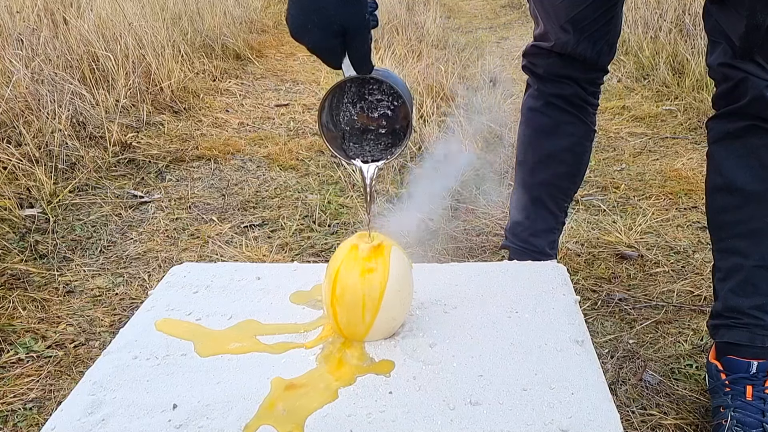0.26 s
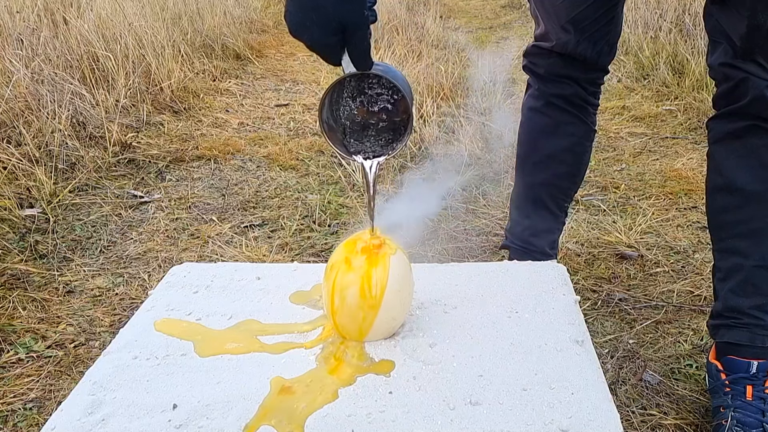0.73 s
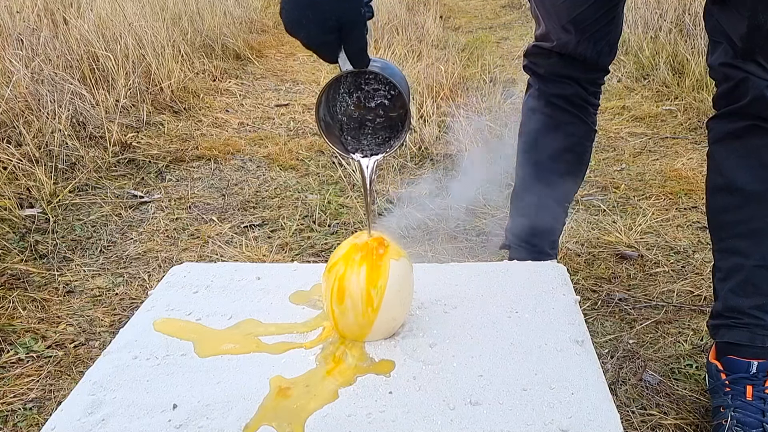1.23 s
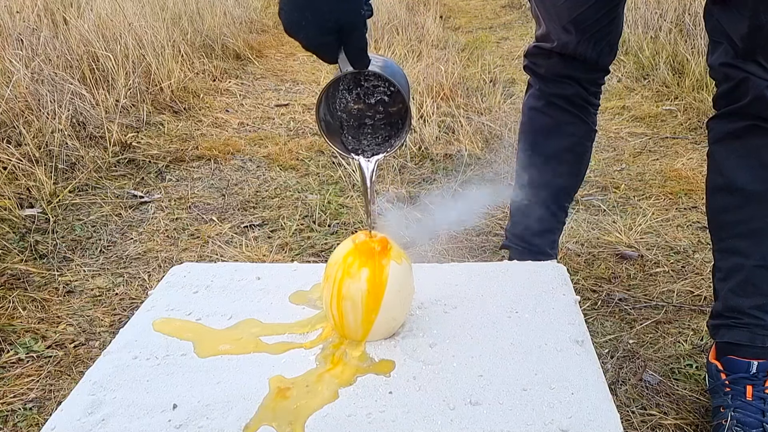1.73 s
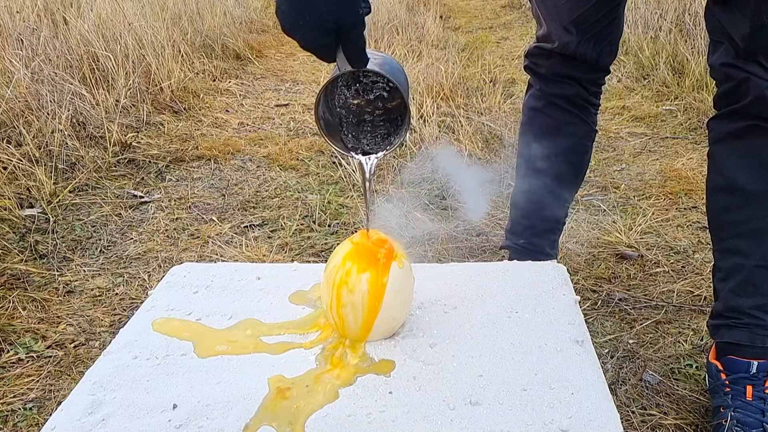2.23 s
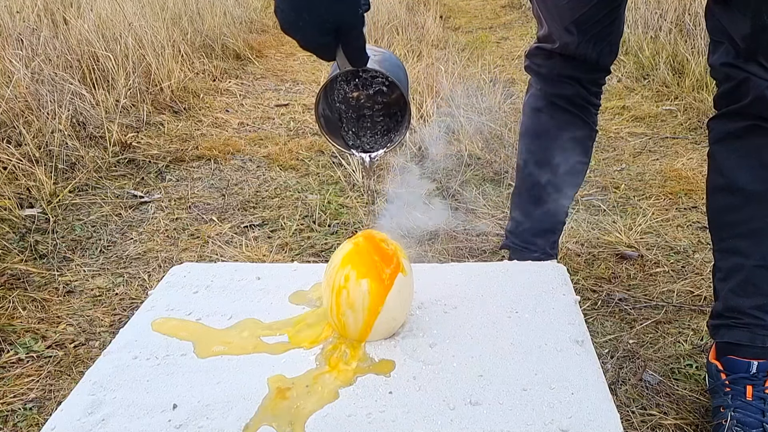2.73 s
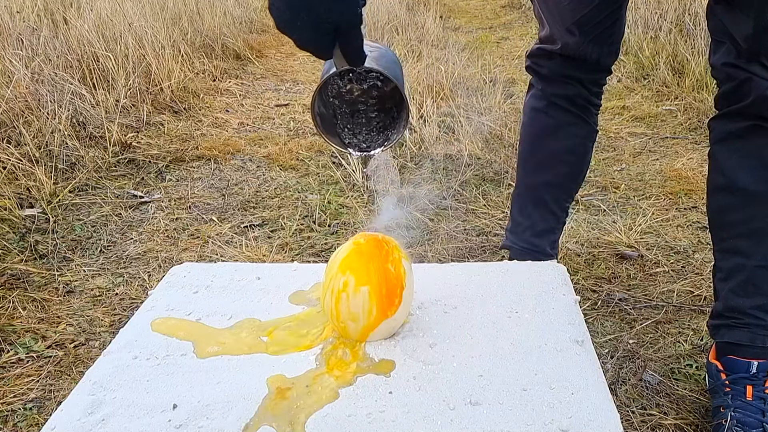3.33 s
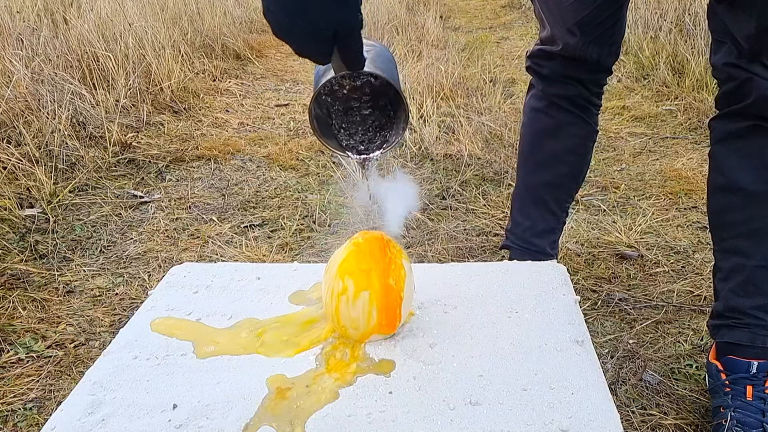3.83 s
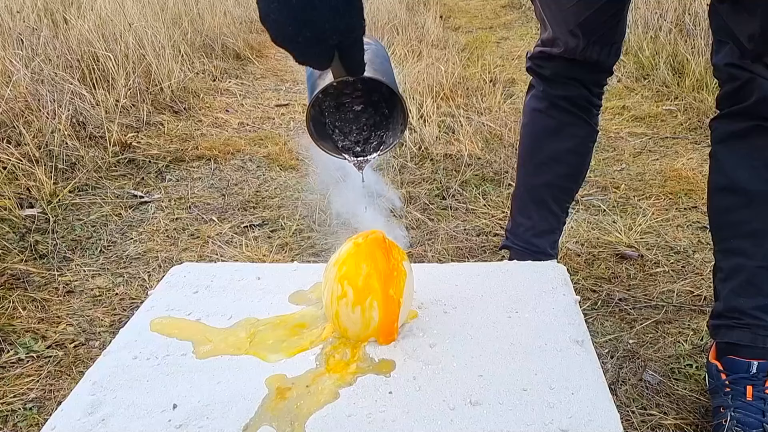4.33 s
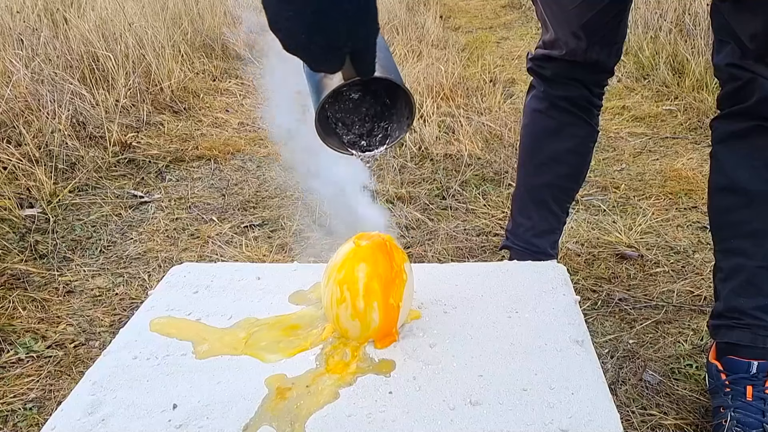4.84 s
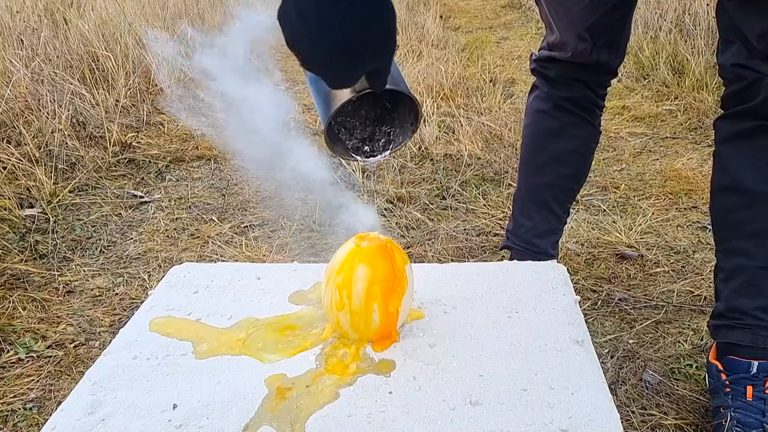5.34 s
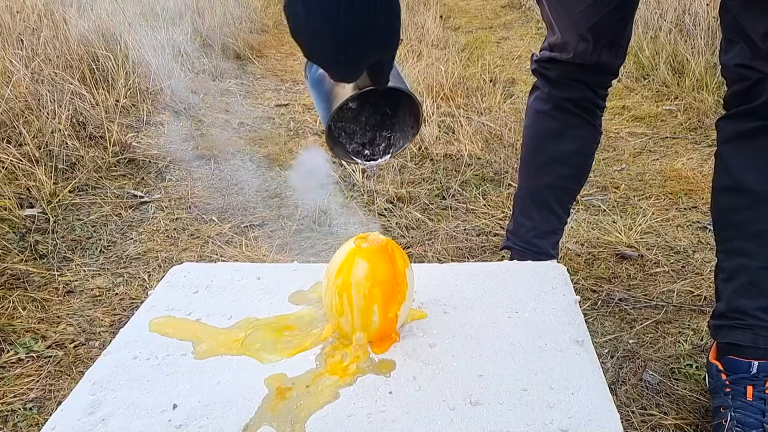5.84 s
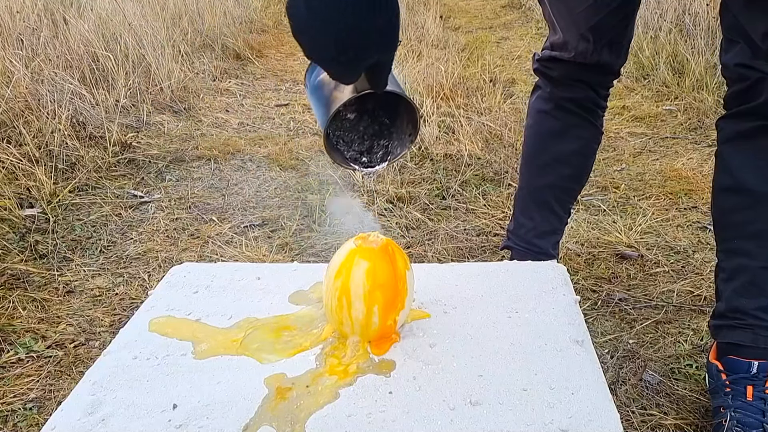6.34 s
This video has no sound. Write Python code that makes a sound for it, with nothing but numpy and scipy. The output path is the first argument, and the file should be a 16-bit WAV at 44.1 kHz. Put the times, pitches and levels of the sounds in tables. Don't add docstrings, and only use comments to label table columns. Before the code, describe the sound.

Close, uneven steam sizzle with sharp ticks, wet spits and low bubbling fades gradually as buffeting wind rumble overwhelms the microphone.

```python
import sys
import numpy as np
from scipy import signal
from scipy.fft import rfft, irfft, next_fast_len
from scipy.io import wavfile
from scipy.ndimage import uniform_filter1d

SR = 44100
rng = np.random.default_rng(int(sys.argv[2]) if len(sys.argv) > 2 else 0)


def ratio(d):
    e = np.asarray(d, float) / 20
    return 10 ** e


def persist_wave(psi):
    counts = np.round(np.clip(psi, -1, 1) * 32767).astype(np.int16)
    wavfile.write(sys.argv[1], SR, np.atleast_2d(counts).T)


N = 289737
TIME = np.arange(N) / SR
PAD = next_fast_len(N + 4096)
HZ = np.maximum(np.arange(PAD // 2 + 1) * SR / PAD, 1)


def rms_one(x):
    return x / np.sqrt(np.mean(x ** 2) + 1e-20)


def in_time(rows):
    s, *columns = np.transpose(rows)
    return [np.interp(TIME, s, column) for column in columns]


def colour(points):
    hz, db = np.transpose(points)
    return ratio(np.interp(np.log(HZ), np.log(hz), db))


def band(low_hz, high_hz, steep):
    return 1 / np.sqrt((1 + (low_hz / HZ) ** steep) * (1 + (HZ / high_hz) ** steep))


def shaped(x, gain):
    return irfft(rfft(x, PAD) * gain, PAD)[..., :N]


def drift(rate):
    r = np.exp(-40 * np.pi * rate / SR)
    slow = signal.lfilter([1], [1, -2 * r, r * r], rng.standard_normal(N // 20 + 2002))[2000:]
    return np.interp(np.arange(N) / 20, np.arange(len(slow)), rms_one(slow))


def evened(x, span_s, share):
    power = uniform_filter1d(x ** 2, int(span_s * SR)) + 1e-9
    return rms_one(x / power ** (share / 2))


def swells(seep_db, times, levels_db, rises_ms, falls_ms):
    power = ratio(2 * seep_db)
    for s, db, rise, fall in zip(times, levels_db, rises_ms, falls_ms):
        near = slice(max(int((s - .2) * SR), 0), int((s + .25) * SR))
        ms = 1000 * (TIME[near] - s)
        width = np.where(ms < 0, max(0.94 * rise - 1.2, .5), max(fall, 1))
        power[near] += ratio(2 * db) * np.exp(-(ms / width) ** 2)
    return np.sqrt(power)


def turbulence(per_s, pitches, cycles, grain_share, scattered):
    sizes_db = 4 * np.minimum(rng.exponential(1, N), 3)
    born = (rng.random(N) < per_s / SR) * ratio(sizes_db) * rng.choice([-1, 1], N)
    dealt, rings = rng.integers(0, len(pitches), N), 0
    for k, hz in enumerate(pitches):
        r, turn = ratio(-60 * hz / cycles / SR), 2 * np.pi * hz / SR
        struck = born * (dealt == k) + 1e-18
        ring = signal.lfilter([1], [1, -2 * r * np.cos(turn), r * r], struck)
        rings = rings + rms_one(ring) * np.sqrt(hz)
    direct = rng.standard_normal(N) + grain_share * rms_one(rings)
    return rfft(direct + scattered * rng.standard_normal((2, N)), PAD)


def opening(source, edges, envelope, climb_ms, patchy_db, together, tilt_db=0):
    out = 0
    for low_hz, high_hz in zip(edges, edges[1:]):
        early = np.interp(TIME + climb_ms / 1000 * np.log2(2500 / low_hz), TIME, envelope)
        flicker = ratio(together + patchy_db * drift(24.0) + tilt_db * np.log2(low_hz / 1000))
        out = out + irfft(source * band(low_hz, high_hz, steep=14.3), PAD)[:, :N] * early * flicker
    whole = source * band(edges[0], edges[-1], steep=2.69)
    return out / np.sqrt(np.mean(np.abs(whole) ** 2) / N)


def field():
    rustle = rng.standard_normal(N) + 1.6 * rng.standard_normal((2, N))
    fizz = rng.standard_normal(N) + .7 * rng.standard_normal((2, N))
    rustle = rms_one(shaped(rustle, band(300, 1600, steep=6.9)))
    fizz = rms_one(shaped(fizz, band(16000, 18000, steep=15)))
    return ratio(-61.0) * rustle + ratio(-48) * fizz


# (time [s], left level [dB], right level [dB])
BREEZE = [(0.0, -45, -58), (0.56, -66, -60), (1.12, -76, -44), (1.68, -51, -44.5), (2.23, -46.5, -43.5),
          (2.79, -43, -48), (3.35, -74, -54), (3.91, -42, -44), (4.47, -43.5, -60), (5.03, -40, -29),
          (5.59, -31, -26), (6.15, -40.5, -55), (6.57, -26, -21)]
# (time [s], level [dB], width [ms], sharp edge re rumble [dB])
GUSTS_LEFT = [(0.168, -40, 54, -28), (0.529, -34.5, 56, -27), (0.747, -39, 66, -24), (0.876, -28, 3.7, -20),
              (1.147, -45.5, 170, -28), (1.834, -38, 24, -29), (2.001, -42, 81, -18), (2.358, -37, 26, -23),
              (3.082, -43, 110, -21), (3.209, -35, 28, -40), (3.418, -34.5, 28, -32),
              (3.508, -31.5, 7.1, -12), (3.737, -30, 31, -22), (3.905, -30, 34, -25), (4.344, -44, 15, -23),
              (4.695, -30, 13, -18), (4.909, -22, 26, -17), (4.974, -7, 12, -24), (5.137, -17, 37, -27),
              (5.288, -18.5, 14, -25), (5.596, -19, 11, -23), (5.727, -13.5, 46, -32),
              (5.851, -16.5, 36, -12), (5.884, -7, 25, -29), (6.162, -14.5, 7.2, -29),
              (6.332, -13.5, 34, -23)]
GUSTS_RIGHT = [(0.256, -33.5, 86, -22), (0.521, -33, 32, -34), (0.689, -37, 21, -35), (0.929, -37, 87, -23),
               (1.825, -38, 16, -28), (2.367, -39, 29, -25), (3.108, -48, 300, -14),
               (3.221, -28.5, 7.4, -32), (3.373, -33, 22, -23), (3.692, -28, 36, -32),
               (3.929, -32, 26, -23.5), (4.138, -39, 17, -14), (4.387, -40, 36, -26),
               (4.599, -20, 19.4, -34), (4.713, -20.5, 26, -20), (4.844, -19.5, 47, -30),
               (5.06, -12, 34, -10.5), (5.133, -5.5, 3.9, -30), (5.242, -16, 9.5, -9),
               (5.306, -21, 7, -37.9), (5.453, -18, 24, -7), (5.522, -7.5, 14.6, -4),
               (5.59, -13.5, 27, -15.5), (5.803, -16, 75, -16), (6.007, -14.5, 9.3, -34),
               (6.086, -19, 29, -21), (6.217, -24.5, 53, -17), (6.302, -25, 9.4, -20),
               (6.521, -12.5, 16.6, -17.5)]
# (frequency [Hz], density [dB per Hz])
WIND_COLOUR = [(15, -32), (25, -28), (38, 10), (58, 12.5), (100, 7), (180, -7.5), (300, -54)]


def wind():
    squall_s, squall_edge_db = 4.5, -10.5
    out = []
    for breeze_db, gusts in zip(in_time(BREEZE), (GUSTS_LEFT, GUSTS_RIGHT)):
        s, db, width, edge_db = np.transpose(gusts)
        rumble = rms_one(shaped(rng.standard_normal(N), colour(WIND_COLOUR)))
        rumble = evened(rumble, span_s=.025, share=.45)
        edge = shaped(rng.standard_normal(N) * ratio(3.5 * drift(30)), band(130, 270, steep=8))
        thump = swells(breeze_db, s, db, 1.31 * width, width)
        edge_peaks_db = db + edge_db + 5.0 + squall_edge_db * (s > squall_s)
        lumps = swells(breeze_db - 20.5, s - .004, edge_peaks_db, width, 0.99 * width)
        out.append(rumble * thump + rms_one(edge) * lumps)
    return np.array(out)


# (time [s], level [dB], fall [ms], brightness [dB])
POPS = [(0.25, -27.5, 25.5, -8), (0.515, -27.5, 13, -1), (0.575, -30, 40, -5), (0.761, -30, 10, -4),
        (0.891, -28, 35, -1.5), (1.4, -20, 11.3, -1.5), (1.531, -22, 9.2, 0.5), (1.691, -17, 18, -0.5),
        (2.047, -21.5, 12, 5), (2.104, -20.5, 32, 3.5), (2.343, -21, 10.3, -14), (2.374, -30, 140, -2),
        (2.488, -26.5, 19, 0), (2.857, -27, 14, 1.5), (3.619, -23.5, 26.7, 4.5), (3.693, -25, 22, 6),
        (3.817, -22.5, 11, 6.5), (3.865, -22, 8.3, 8), (3.987, -23.5, 20, 5), (4.056, -25, 43, 6.5),
        (4.279, -28, 6.5, -3), (4.342, -21, 14.4, 3.5), (4.573, -28.5, 88, 12), (4.701, -32, 7, 3),
        (4.796, -28, 16, 1.5), (5.083, -24.5, 20, 5), (5.205, -23, 18, 3.5), (5.347, -27.5, 26, 5),
        (5.559, -28, 7.8, 1.5), (6.042, -40, 170, 13)]
# (time [s], level [dB], half length [ms], brightness [dB])
HEAVES = [(0.106, -26.5, 6, 2.5), (0.42, -27.5, 13.5, 23), (0.702, -24, 2.3, 4), (1.074, -20.5, 6.3, -11),
          (1.145, -24, 28, -1), (1.23, -21.5, 12.7, -9), (1.286, -21, 14.5, -1.5), (1.349, -24.5, 21, -2.5),
          (1.471, -20, 4, 4), (1.782, -20.5, 5.9, -1), (2.035, -27, 29, 0.5), (2.276, -19.5, 12, -8),
          (2.558, -19, 9.3, -1), (2.61, -32, 32, 13), (2.685, -21, 36, 2), (2.723, -17, 2.9, -17),
          (2.78, -15.5, 3.9, 6), (3.112, -36.5, 69, 0), (3.42, -28, 29.5, 2.5), (3.509, -24, 6.4, 6),
          (3.758, -23, 21, 4.5), (3.913, -28, 10, 3), (4.165, -25.5, 67, 5.5), (4.45, -34, 53, 5),
          (4.887, -26.5, 15, 10), (4.978, -29, 32, 9), (5.206, -34.5, 34, -8), (6.05, -23, 8.3, 4.5),
          (6.348, -39.5, 140, 4.5)]
# (time [s], level [dB], rise [ms])
SURGES = [(0.034, -24.5, 115), (0.213, -34.5, 74), (0.426, -31.5, 52), (0.84, -29, 43), (1.484, -29, 57),
          (1.881, -19, 39), (1.986, -21.5, 35), (3.011, -38, 26), (3.566, -27.5, 47), (3.873, -29, 48),
          (3.966, -28, 38), (4.918, -29, 44), (5.48, -36, 92)]
# (time [s], level [dB], brightness [dB])
SPURTS = [(0.21, -30.5, 14), (0.254, -35, 3), (0.325, -35, 0), (0.392, -28.5, -13), (0.479, -33.5, -15),
          (0.775, -30.0, 0), (0.802, -24, -10), (0.854, -24, -2), (0.996, -27, -20), (1.011, -24, 0),
          (1.172, -29, 13), (1.309, -29, 2), (1.655, -24, 4), (1.764, -26, 7), (1.815, -19, 14),
          (1.866, -22, 1), (1.878, -25, -1), (1.986, -25, 15), (2.104, -25, 11), (2.379, -21.5, 14),
          (2.487, -23.5, -20), (2.605, -29, 10), (2.722, -24.5, -5), (2.76, -21, -2.5), (2.783, -27, -1.0),
          (2.811, -25, 8), (3.005, -25, 14), (3.092, -26.5, 12), (3.656, -20, 12.0), (3.868, -23.5, 0),
          (3.965, -26, 11), (4.158, -26, 5), (4.434, -26.5, 2), (4.576, -34, -2), (4.653, -36, 7),
          (4.704, -26, 15), (4.847, -36, 11), (4.98, -29.5, 0)]


def puffs():
    pops = [(s - .0015, db, 4.3, ms, bright) for s, db, ms, bright in POPS]
    heaves = [(s, db, 1.03 * ms, ms, bright) for s, db, ms, bright in HEAVES]
    surges = [(s, db, ms, 0.14 * ms, 2) for s, db, ms in SURGES]
    spurts = [(s, db, 6, 4.3, bright) for s, db, bright in SPURTS]
    return np.transpose(pops + heaves + surges + spurts)


# (frequency [Hz], density [dB per Hz])
JET_COLOUR = [(2000, 13.5), (2800, -2), (4000, -0.5), (7000, 3.5), (8400, 3), (12000, -1.5), (15500, 12)]


def steam(hiss_db, bright_db):
    s, db, rise, fall, bright = puffs()
    pitches = np.geomspace(2800, 11000, 18)
    jet = turbulence(per_s=1400, pitches=pitches, cycles=70, grain_share=.6, scattered=.6)
    jet = jet * colour(JET_COLOUR)
    flutter_db = 1.85 * drift(40)
    lower_hz = [2570, 3400, 4420, 5450, 6300, 7400]
    upper_hz = [8200, 10100, 11500, 14300, 16900]
    out = 0
    for sign, edges in ((-1.83, lower_hz), (1.0, upper_hz)):
        share = lambda tilt_db: -10 * np.log10(1 + ratio(-2 * sign * tilt_db))
        envelope = swells(hiss_db + share(bright_db), s, db + share(bright), rise, fall)
        out = out + opening(jet, edges, envelope, climb_ms=0.75, patchy_db=3.0, together=flutter_db)
    return ratio(-3.0) * out


# (time [s], level [dB], length [ms])
GURGLES = [(0.004, -30.5, 23), (0.102, -24.5, 20), (0.153, -34, 38), (0.226, -28.5, 18), (0.85, -43, 290),
           (0.997, -29, 14), (1.076, -38, 10), (1.13, -32.5, 34), (1.229, -30, 60), (1.31, -28, 94),
           (1.43, -34, 230), (1.697, -31, 27), (1.852, -27, 33), (1.953, -24.5, 39), (2.017, -18, 18.6),
           (2.118, -30, 16.3), (2.194, -27, 26), (2.271, -31.5, 81), (2.345, -23, 29), (2.408, -26, 29),
           (2.481, -30, 72), (2.547, -23, 26), (2.633, -27, 36), (2.768, -36.5, 106)]


def froth_bursts():
    rise_share, pour_end_s = 0.62, 3.0
    stir_db, drying_db_per_s, stretch = -14.5, -2.5, 2.12
    poured = [(s, db, rise_share * ms, (1 - rise_share) * ms) for s, db, ms in GURGLES]
    stirred = [(s, db + stir_db + drying_db_per_s * max(s - pour_end_s, 0), rise, stretch * fall)
               for s, db, rise, fall, _ in puffs().T]
    return np.transpose(poured + stirred)


# (frequency [Hz], density [dB per Hz])
MOUTH_COLOUR = [(200, -1), (300, -9), (500, -6), (900, -3), (1500, 0), (2200, 0.5), (3000, 9)]
# (time [s], tilt [dB per octave])
HOLLOW = [
    (0, -4.5),
    (.7, -2.5),
    (1.3, 1),
    (2.8, -2),
    (4.4, -3.5),
    (6.57, 4),
]


def gurgle(gurgle_db):
    envelope = swells(gurgle_db, *froth_bursts())
    pitches = np.geomspace(300, 2400, 9)
    froth = turbulence(per_s=400, pitches=pitches, cycles=12, grain_share=.36, scattered=.2)
    froth = froth * colour(MOUTH_COLOUR)
    return ratio(-4.5) * opening(froth, np.geomspace(200, 3000, 8), envelope, climb_ms=3.7,
                               patchy_db=1.5, together=3.0 * drift(34), tilt_db=in_time(HOLLOW)[0])


def bloops():
    out, waver = np.zeros(N), drift(210.0)
    for s, db, length in GURGLES:
        near = slice(max(int((s - .04) * SR), 0), int((s + .03) * SR))
        part = (TIME[near] - s) * 1000 / length
        octaves = 4 * np.minimum(part + .1, .05 * part) + .1 * waver[near]
        hz = np.maximum(1800 * 2 ** octaves, 420)
        level_db = db - 1 - .5 * max(length - 20, 0)
        bell = np.exp(-((part + 0.13) / 0.071) ** 2)
        out[near] += ratio(level_db) * bell * np.sin(2 * np.pi * np.cumsum(hz) / SR)
    return out


# (time [s], peak level [dB])
TICKS = [(0.2536, -15), (0.31, -11), (0.3223, -12.5), (0.3668, -7), (0.4215, -14), (0.7009, -5.5),
         (0.7607, -7), (0.8534, -3), (0.9958, -13), (1.177, -16), (1.312, -8), (1.3968, -6), (1.4064, 0),
         (1.4222, -14), (1.452, -13), (1.4681, -14), (1.4706, -13), (1.614, -1), (1.7045, -13),
         (1.8657, -10), (1.9222, -14), (1.9418, -8), (1.9844, -4), (2.0532, -7), (2.1024, -7), (2.135, -13),
         (2.1403, -9), (2.144, -21), (2.1942, -12), (2.2644, -14), (2.3448, -15), (2.4286, 0.5),
         (2.4866, -17), (2.6053, -15), (2.6255, -12), (2.7127, -11), (2.826, -23), (2.9088, -16),
         (2.9849, -17), (3.2109, -17), (3.5662, -15), (3.5725, -16), (3.7021, -14), (3.7082, -15),
         (3.9266, -20), (3.962, -8), (3.9878, -17), (4.0075, -11), (4.0663, -10.5), (4.175, -15),
         (4.3449, -16), (4.7036, -13), (4.98, -9), (5.0355, -17), (5.084, -13), (5.098, -15)]


def ticks(hiss_db):
    tick_db, tick_ms, stray_per_s, stray_db = -5, 0.038, 300, 3.5
    sizes_db = 1.37 * np.minimum(rng.exponential(1, N), 3)
    marks = (rng.random(N) < stray_per_s / SR) * ratio(hiss_db + stray_db + sizes_db)
    s, db = np.transpose(TICKS)
    marks[np.round(s * SR).astype(int)] = ratio(db + tick_db)
    part = np.arange(-20, 21) / SR * 1000 / tick_ms
    return np.convolve(marks, (part ** 2 - 1) * np.exp(-part ** 2 / 2), "same")


# (time [s], level [dB], pitch [Hz])
BLUBS = [(0.09, -24.5, 492), (0.155, -29, 465), (0.219, -23.5, 440), (0.368, -22, 424), (0.441, -34, 370),
         (0.464, -26, 427), (0.574, -24.5, 510), (0.615, -27, 416), (0.685, -26, 447), (0.752, -28, 428),
         (0.847, -27, 468), (0.881, -28, 438), (0.973, -33.0, 467), (1.054, -25, 488), (1.764, -41, 550),
         (1.813, -29, 361), (1.945, -27, 443), (2.005, -24, 477), (2.174, -29, 455), (2.234, -26, 366.0),
         (2.331, -31, 451), (2.4, -25, 336), (2.725, -28.5, 389), (3.375, -31, 487), (3.787, -29, 414),
         (4.115, -32, 506.0)]


def blubs():
    level_db, length_ms, climb_octaves = -9, 4.14, 0.1434
    out, wobble = np.zeros(N), ratio(2.6 * drift(230.0))
    chance = rng.uniform(-0.998, 1, (len(BLUBS), 2))
    for (s, db, hz), (longer, glide) in zip(BLUBS, chance):
        near = slice(int((s - .025) * SR), int((s + .025) * SR))
        part = (TIME[near] - s) * 1000 / (length_ms * (1 + 0.27 * longer))
        pitch = hz * 2 ** (climb_octaves * (1 + 1.61 * glide) * part)
        out[near] += ratio(db + level_db) * np.exp(-part ** 2) * np.sin(2 * np.pi * np.cumsum(pitch) / SR)
    return out * wobble


# (time [s], peak level [dB], pitch [Hz])
SPITS = [(0.2513, -15.5, 2300), (0.571, -19, 3620), (0.701, -16.5, 2020), (0.761, -25, 2380),
         (0.995, -18, 2220), (1.397, -20, 3800), (2.1024, -25, 3860), (2.263, -10.5, 2230),
         (2.488, -31, 3960), (2.603, -30, 3790), (4.092, -24.5, 895), (4.678, -33, 610), (4.685, -34, 970),
         (4.783, -28.5, 950)]


def spits():
    out, after = np.zeros(N), np.arange(300) / SR
    for s, db, hz in SPITS:
        cycles = after * hz
        first, ring = np.sin(np.pi * cycles / 2) + .3, .35 * np.exp(-cycles / 1.5)
        pulse = np.sin(2 * np.pi * cycles) * np.where(cycles < 1, first, ring)
        pulse[:2] -= hz / 2500
        start = round(s * SR)
        out[start:start + 300] += ratio(db + 1) * pulse
    return out


# (time [s], level [dB])
SLAPS_LEFT = [(4.967, -17.0), (5.075, -23), (5.111, -24), (5.166, -23), (5.499, -22), (5.64, -30),
              (5.664, -18.5), (5.692, -23), (5.737, -20), (5.774, -28), (5.861, -12.5), (5.889, -20),
              (6.156, -22), (6.278, -35), (6.332, -16)]
SLAPS_RIGHT = [(4.798, -19), (4.83, -20), (5.052, -9), (5.081, -10), (5.138, -19), (5.241, -23),
               (5.424, -11), (5.454, -7.5), (5.511, -8), (5.549, -30), (5.586, -9.5), (5.727, -15),
               (5.744, -29), (5.808, -15.5), (5.87, -25), (6, -26.5), (6.095, -20.5), (6.519, -17)]


def slaps():
    out = []
    for table in (SLAPS_LEFT, SLAPS_RIGHT):
        s, db = np.transpose(table)
        rumble = shaped(rng.standard_normal(N), band(75, 207.5, steep=7.4))
        burst = evened(rumble, span_s=0.013, share=0.38)
        length_ms = np.full(len(s), 4.2)
        out.append(burst * swells(np.full(N, -90.), s, db - 3, length_ms, length_ms))
    return np.array(out)


# (delay [ms], gain [ratio], dull above [Hz])
ECHOES = [
    [(.19, 0.14, 8850), (.35, -0.033, 9000), (.53, 0.4, 3720), (.6, -0.09, 30000), (.91, 0.019, 30000),
     (2.15, 0.23, 1100), (2.56, -0.05, 30000)],
    [(.17, 0.082, 19500), (.366, -0.052, 30000), (.5, 0.39, 3400), (.79, -0.034, 30000), (.91, 0.12, 30000),
     (2.09, 0.41, 1180), (2.47, 0.16, 30000)],
]
# (pitch low [Hz], pitch raised [Hz], width [Hz], level low [dB], level raised [dB])
RIPPLE = [(680, 720, 24, -17, -1), (2560, 2520, 108, -23, -10), (3380, 2460, 74, -6, -3),
          (3720, 3640, 227, 5.5, 8), (3990, 1700, 95, 8, 14), (4370, 6100, 53, 6, -8),
          (5180, 3850, 850, -3.5, -1.5), (6860, 11000, 63, 2, -20), (7040, 6970, 250, 0.5, 3.5),
          (7700, 4700, 64, -0.5, -17), (8800, 7440, 140, -2, 4.5), (9400, 9000, 500, -5, -10),
          (12100, 12000, 1660, 6.5, 5.5), (14400, 15100, 1900, -1, -8)]
# (frequency [Hz], phase [radians])
PORT_PHASE = [(0, 0), (2600, 0.62), (3300, 1.5), (4600, 2), (5300, 2), (7900, 2), (9800, 5), (12000, 4),
              (16600, 6.5)]


def to_ports(raised, stubble):
    combs = []
    for port, rough in zip(ECHOES, stubble):
        comb = 1
        for ms, gain, dull_hz in port + rough:
            delay_s = ms * (1 - 0.067 * raised * (ms > 2.3)) / 1000
            comb = comb + gain * np.exp(-2j * np.pi * HZ * delay_s) / (1 + 1j * HZ / dull_hz)
        combs.append(comb)
    combs = np.array(combs)
    ripple_db = 0
    for low_hz, raised_hz, width, low_db, raised_db in RIPPLE:
        off = 2 * (HZ - low_hz - raised * (raised_hz - low_hz)) / width
        ripple_db = ripple_db + (low_db + raised * (raised_db - low_db)) / (1 + off ** 2)
    lead = np.interp(HZ * (1 + .065 * raised), *np.transpose(PORT_PHASE))
    shade = ratio(-2.5 / (1 + (13500 / HZ) ** 8) * [[.5], [-.5]])
    phase = np.angle(combs.sum(0)) + .5 * lead * [[1], [-1]]
    return np.abs(combs) * shade * ratio(ripple_db) * np.exp(1j * phase)


# (time [s], height [0 low - 1 raised])
CAN = [
    (0, 0),
    (2.2, 0.017),
    (2.9, 0.82),
    (3.6, 0.77),
    (4.6, 0.46),
    (5.3, 1),
    (6.57, 0.45),
]


def around_can(egg):
    height = 4 * np.clip(in_time(CAN)[0], 0, 1)
    stubble = [[(ms, 0.034 * rng.choice([-1, 1]), 30000) for ms in rng.uniform(1.6, 4.6, 9)]
               for port in ECHOES]
    out = 0
    for k in range(5):
        nearness = np.maximum(1 - np.abs(height - k), 0)
        out = out + nearness * shaped(egg, to_ports(k / 4, stubble))
    return out


# (time [s], hiss level [dB], gurgle level [dB], brightness [dB])
SEEP = [(0.0, -39, -45.5, -60), (0.4, -44.5, -35, -5), (0.8, -34.5, -34, -8), (1.05, -37, -32, -5),
        (1.3, -36.5, -40, 8.5), (1.75, -28, -29, -4), (2.1, -31.5, -34.5, 3), (2.5, -45, -45.5, -3),
        (2.95, -30.5, -40, 6), (3.3, -43, -46.5, 0), (3.7, -55.5, -44, -12), (4.1, -35.5, -59, 8),
        (4.7, -34.5, -42.5, 1), (5.0, -36.5, -45, 3), (5.25, -43.5, -43.5, 3), (5.63, -41, -51, 5.5),
        (6.25, -44.5, -97, 3), (6.57, -57, -56.5, -10)]


def scene():
    hiss_db, gurgle_db, bright_db = in_time(SEEP)
    air = field() + wind() + slaps()
    egg = steam(hiss_db, bright_db) + gurgle(gurgle_db) + bloops() + blubs() + spits()
    flashes = ticks(hiss_db)
    direct = np.array([np.roll(flashes, -1), np.roll(flashes, 1)])
    return around_can(egg) + direct + air


def top_cut(x):
    return signal.sosfilt(signal.butter(12, 17060, fs=SR, output="sos"), x)


def record(dry):
    top = ratio(np.interp(HZ, [15700, 15850, 16500, 16800], [0, -32, -58, -80]))
    mix = shaped(np.clip(dry, -1, 1), top)
    return top_cut(mix)


dry = scene()
out = record(dry)
persist_wave(out)
```